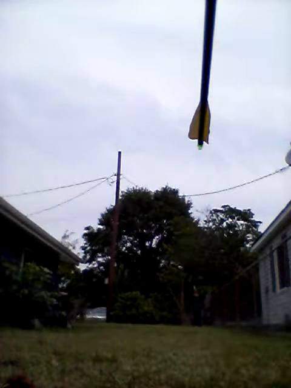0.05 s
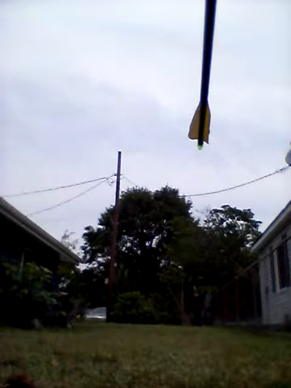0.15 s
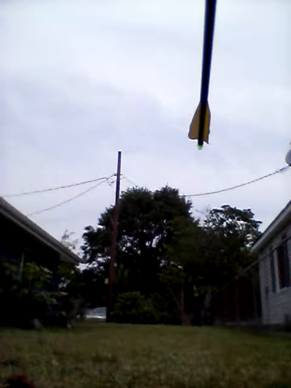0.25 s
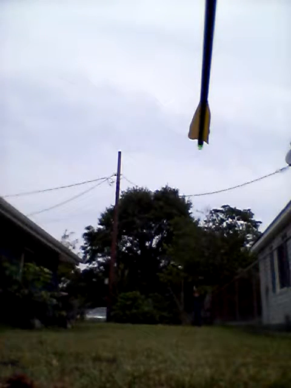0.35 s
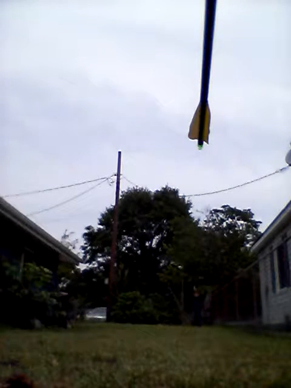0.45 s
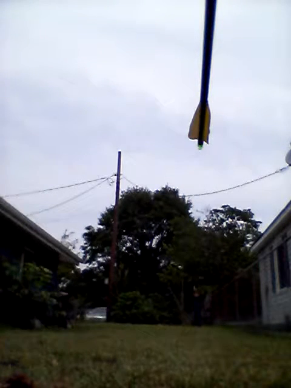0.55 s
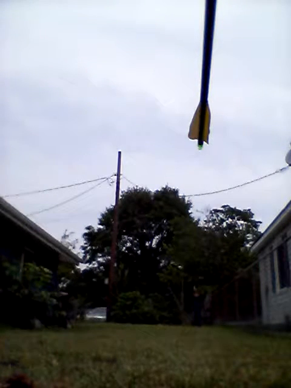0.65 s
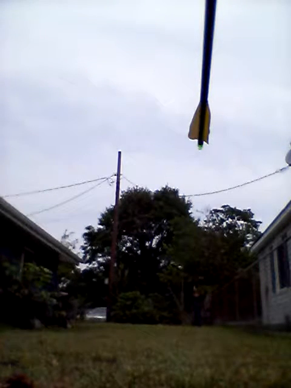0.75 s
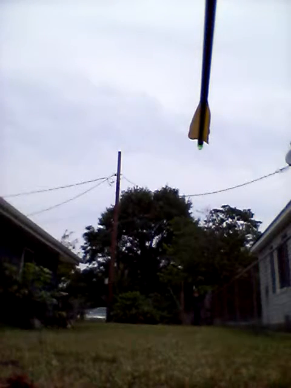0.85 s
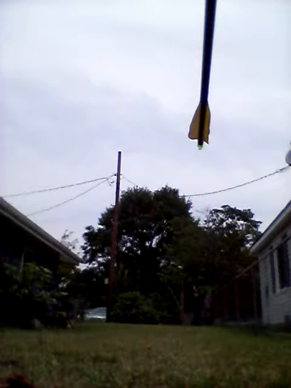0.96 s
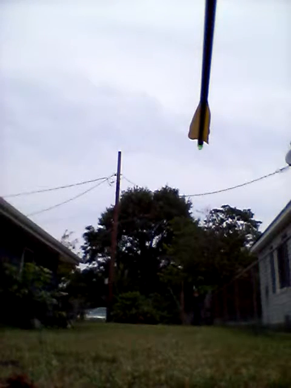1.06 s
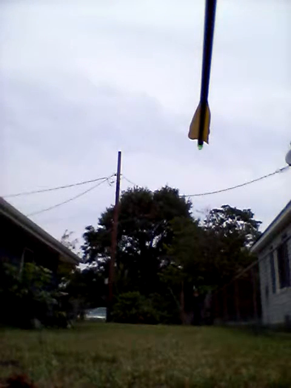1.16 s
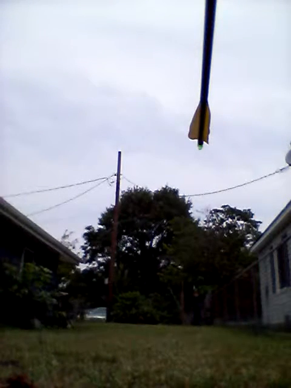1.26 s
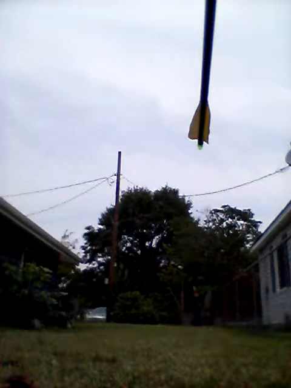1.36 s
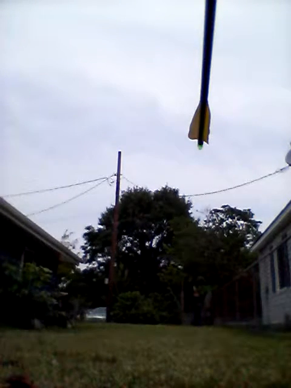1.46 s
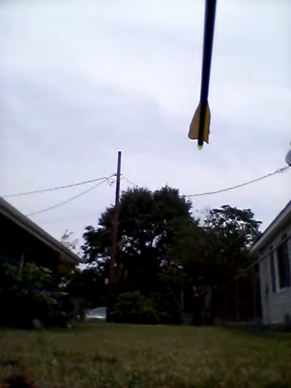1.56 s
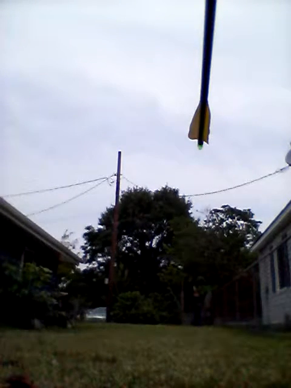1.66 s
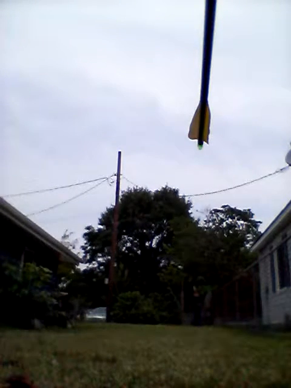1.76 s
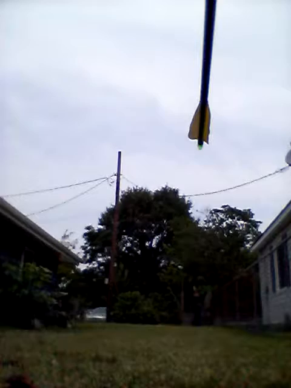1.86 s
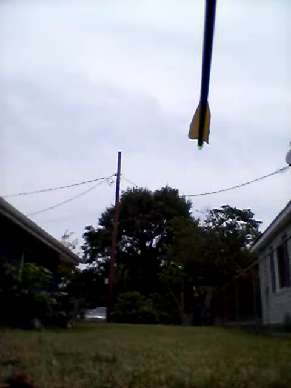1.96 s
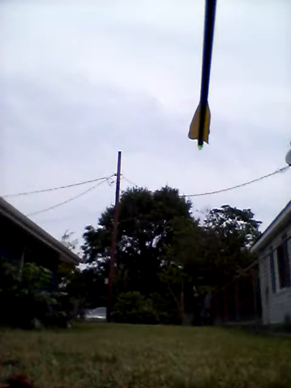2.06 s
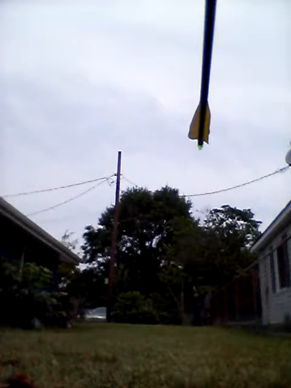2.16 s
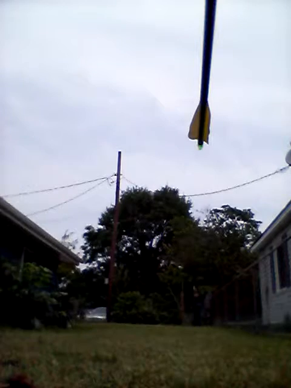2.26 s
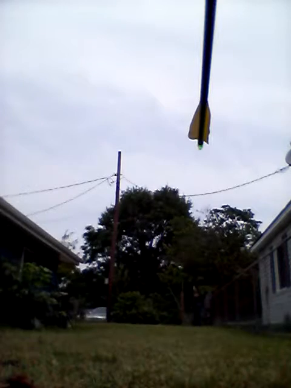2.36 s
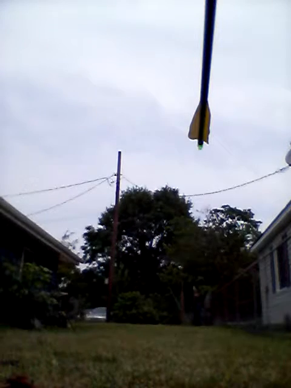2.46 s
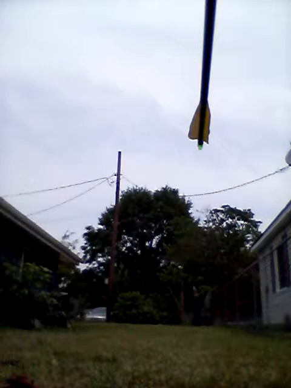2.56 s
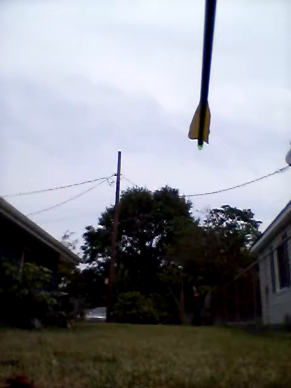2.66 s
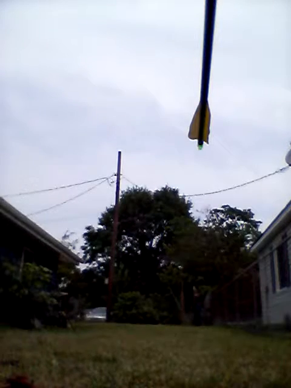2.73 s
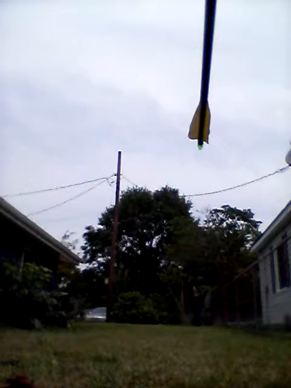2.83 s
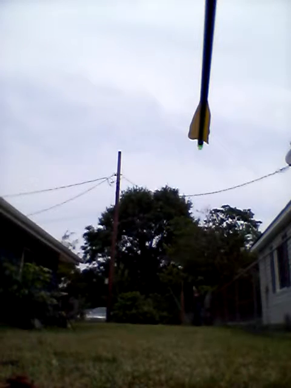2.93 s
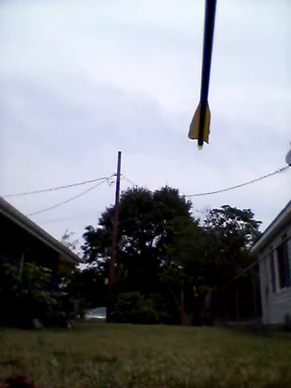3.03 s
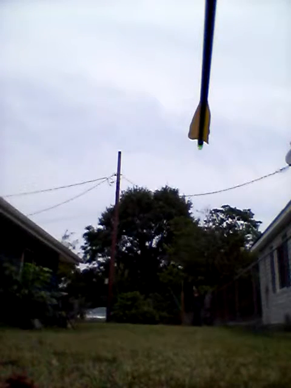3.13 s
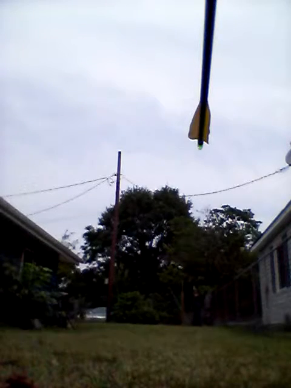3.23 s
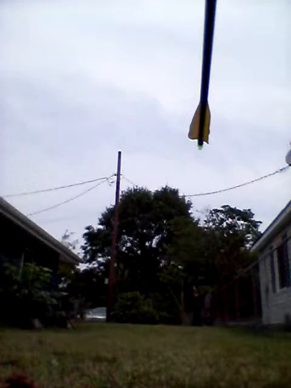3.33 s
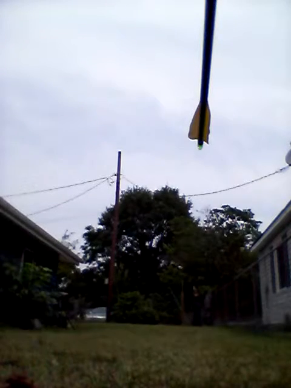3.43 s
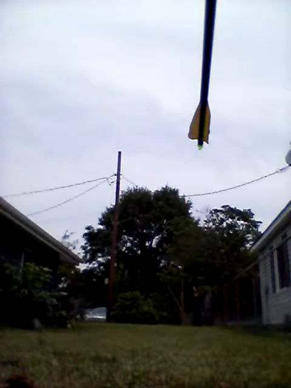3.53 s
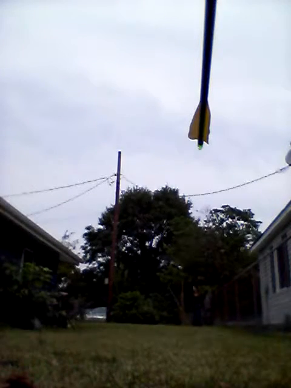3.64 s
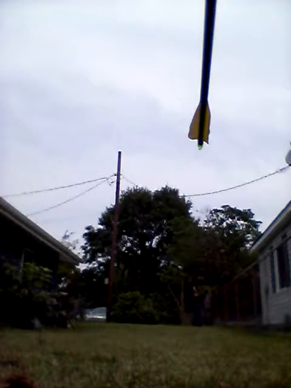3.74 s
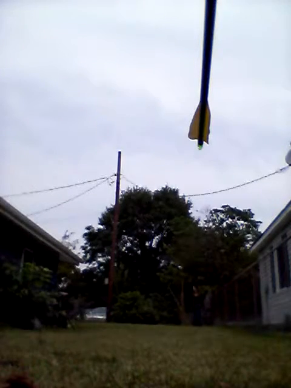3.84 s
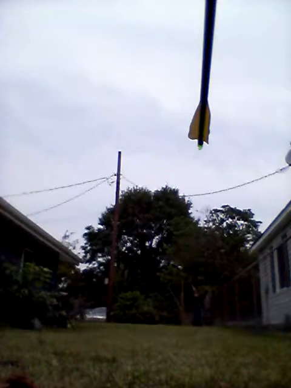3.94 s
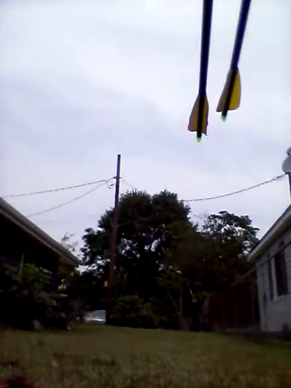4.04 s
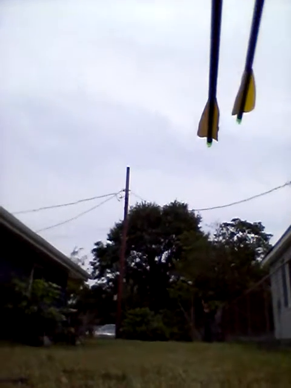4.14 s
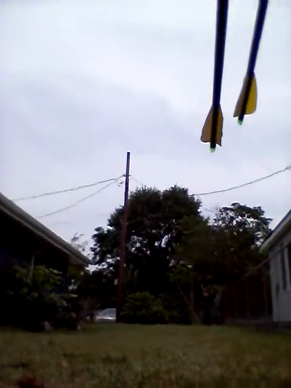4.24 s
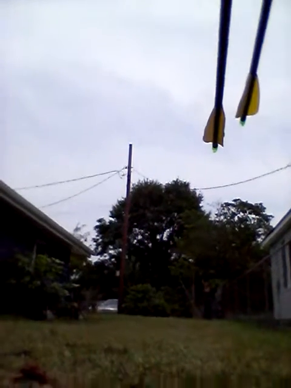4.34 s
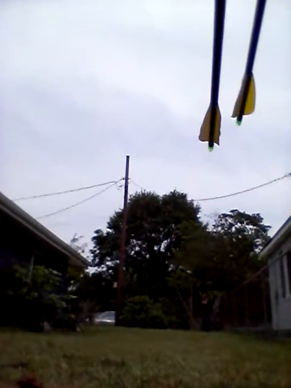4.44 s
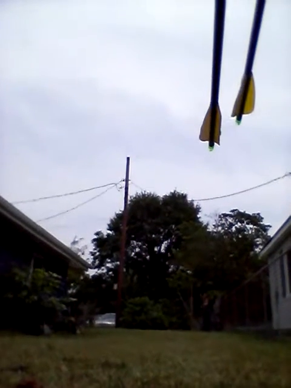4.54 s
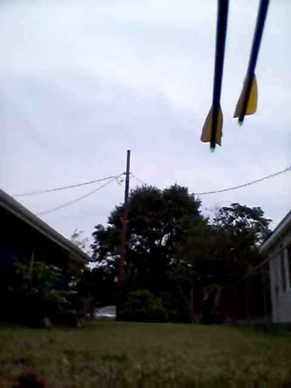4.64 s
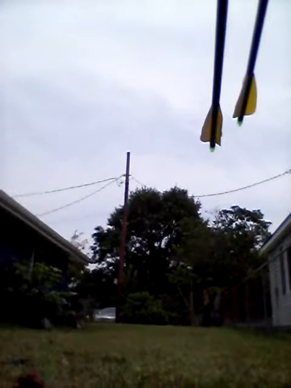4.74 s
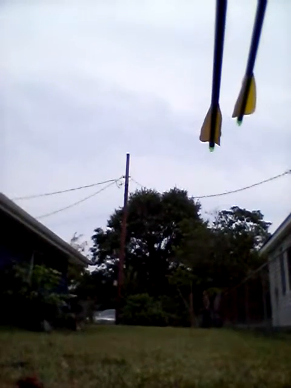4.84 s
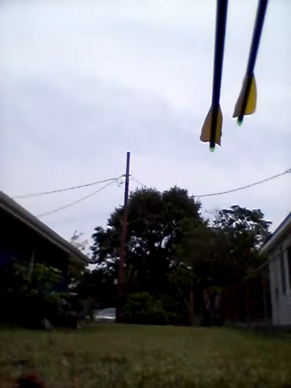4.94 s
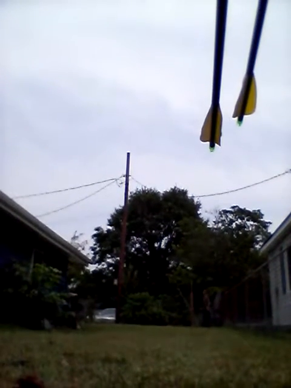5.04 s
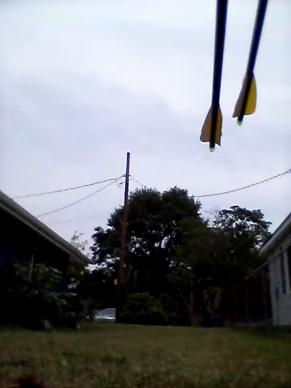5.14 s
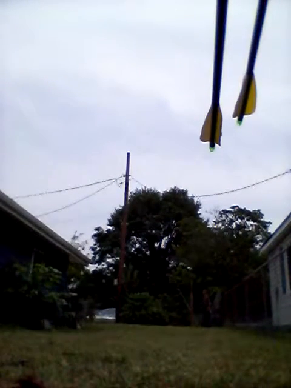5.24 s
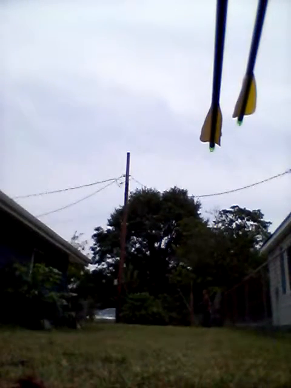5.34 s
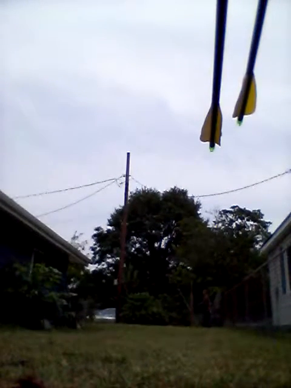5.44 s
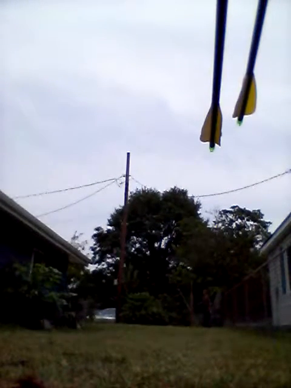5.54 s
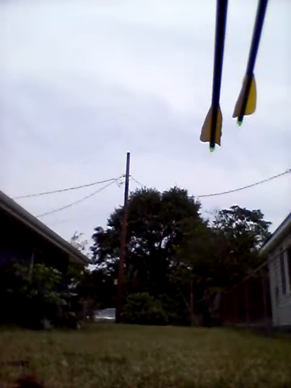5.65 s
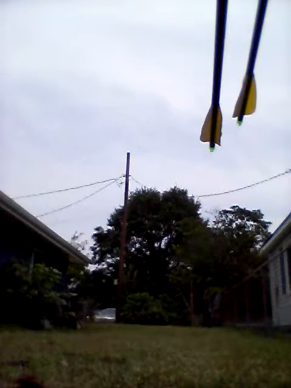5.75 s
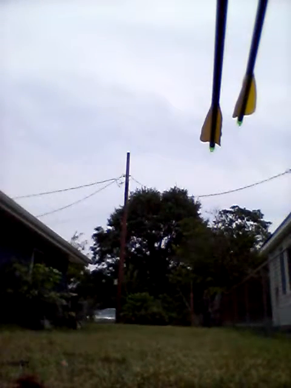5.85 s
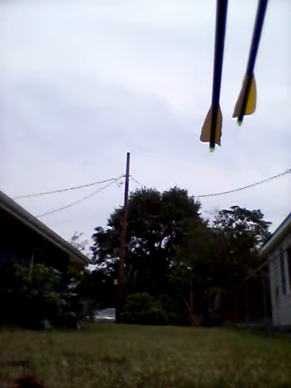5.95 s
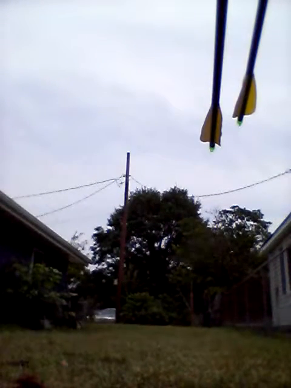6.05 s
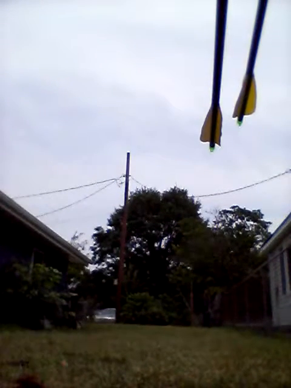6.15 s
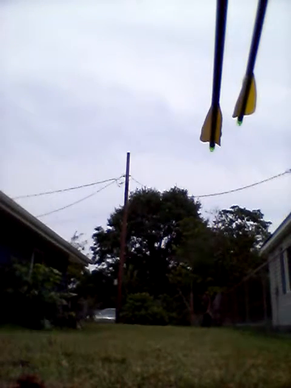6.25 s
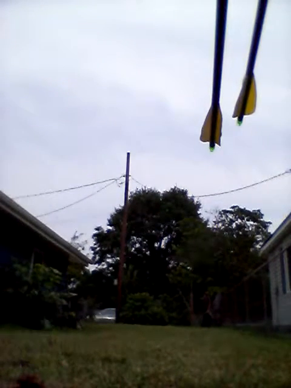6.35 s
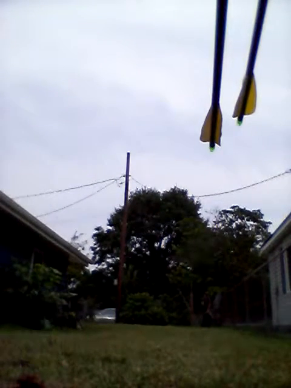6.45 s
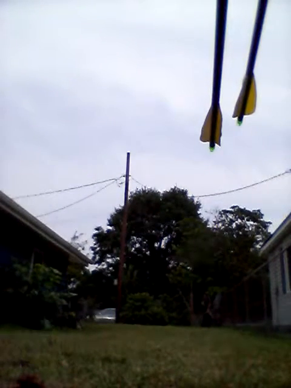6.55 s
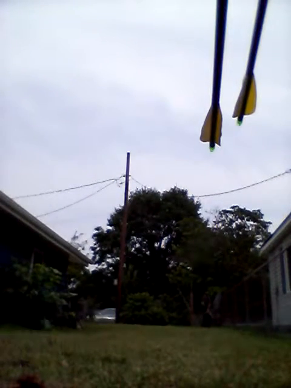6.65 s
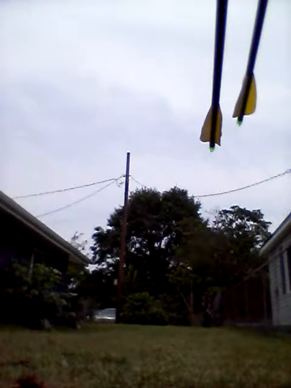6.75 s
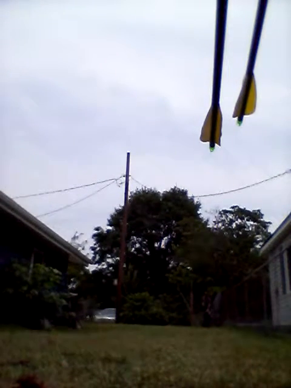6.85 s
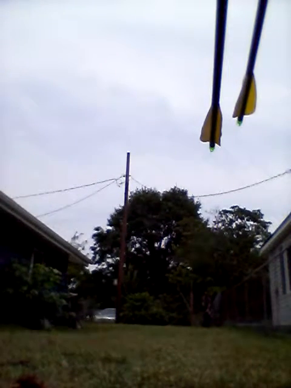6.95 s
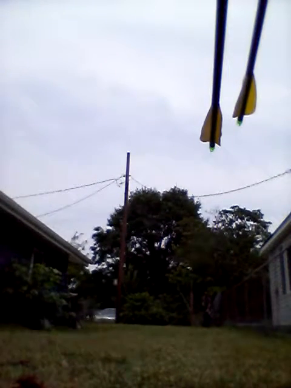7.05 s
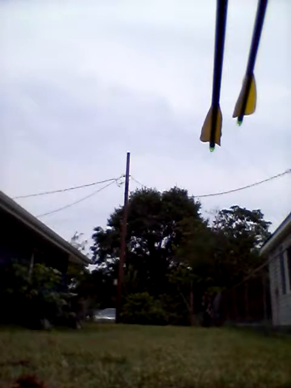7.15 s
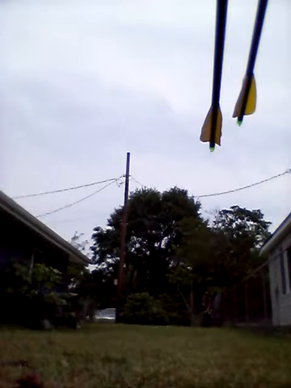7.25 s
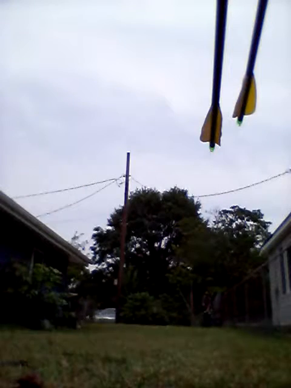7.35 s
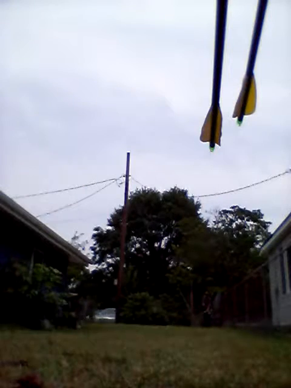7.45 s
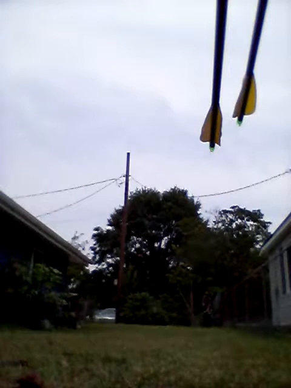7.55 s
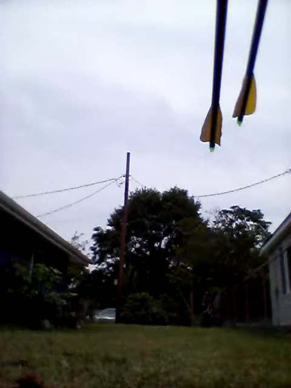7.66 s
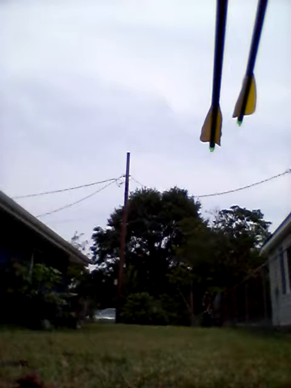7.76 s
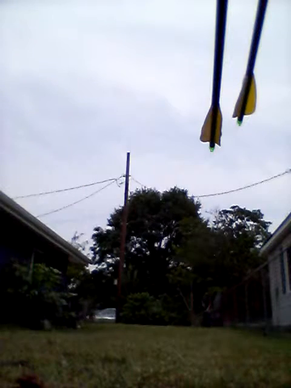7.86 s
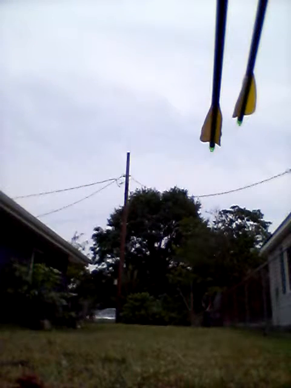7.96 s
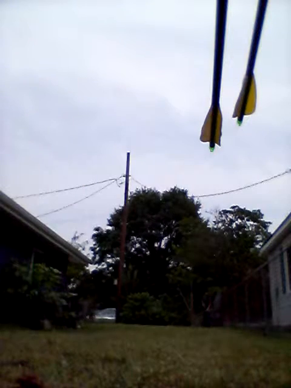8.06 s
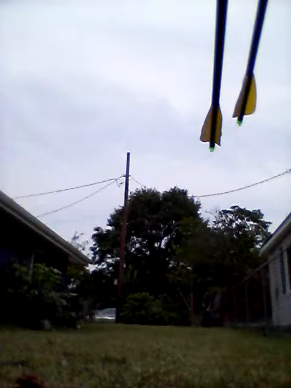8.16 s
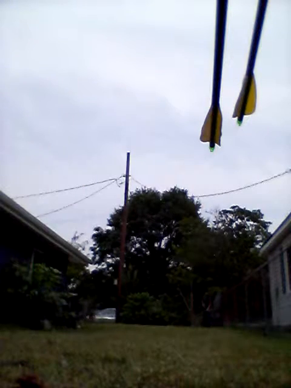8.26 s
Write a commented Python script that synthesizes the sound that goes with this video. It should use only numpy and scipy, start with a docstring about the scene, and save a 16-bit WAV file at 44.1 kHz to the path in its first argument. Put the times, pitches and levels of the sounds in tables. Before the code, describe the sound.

Faint repeated bird chirps and distant traffic, broken by a soft bow snap and the loud, close smack of an arrow striking a target.

```python
"""A backyard, heard from just under an archery target. Distant traffic and an air conditioner's hum
run throughout; thin whistles sound far off, and from 1 s a songbird repeats a falling chirp.
Near 3.9 s a distant bow snaps and the arrow hisses in. It strikes 0.2 s later with a sharp thwack,
exciting the modes of target and shaft. The shaft rattles on while walls, fences and trees scatter
the sound back. The traffic then eases a little and the bird sings on."""
import sys
import numpy as np
from scipy import signal
from scipy.fft import rfft, irfft, next_fast_len
from scipy.io import wavfile
from scipy.ndimage import uniform_filter1d, map_coordinates

SR = 44100
rng = np.random.default_rng(int(sys.argv[2]) if len(sys.argv) > 2 else 0)


def output_pcm(signal):
    """Save a mono or channel-first signal as 16-bit PCM at the path in sys.argv[1].

    Samples are clipped to [-1, 1] before scaling.
    """
    pcm = np.clip(np.atleast_2d(signal).T, -1, 1) * 32767
    wavfile.write(sys.argv[1], SR, np.round(pcm).astype(np.int16))


N = 365677

# the point slaps the face, then the shaft jams in the block and slips to rest (time [s], level [dB])
BLOWS = [(4.0835, -11), (4.0879, -13), (4.0937, -27.5), (4.0965, -22.5), (4.103, -27.5), (4.105, -27)]
# spectrum of each blow's crack (frequency [Hz], relative level [dB])
CRACK_SPECTRUM = [(300, -20.5), (1000, -7), (1800, 1), (2700, 2), (3400, -0.5), (4200, -4), (6500, 1),
                  (9000, -10.5), (13000, -11), (16500, -20.5)]
# modes of the taut face, the block it covers, the whole target on its stand and the arrow shaft
# (frequency [Hz], relative level [dB], T60 [s])
FACE_MODES = [(720.6, -18.5, .065), (946, -9, .039), (968, 0, .019), (1403, -5, 0.021)]
BLOCK_MODES = [(115, -12, 0.04), (368, 0.5, .017), (526, -14.5, 0.045), (700, -29, .03),
               (866.6, -7.5, 0.03), (1159.5, -20, .046)]
STAND_MODES = [(77, -22.5, 0.06), (201, -3, .06), (397, -5, 0.058), (604.2, -26, .04), (743, -18.5, .075)]
SHAFT_MODES = [(1920, -28, 0.05), (2700, -19, .035), (3020, -27, 0.062), (3234, -18, .05),
               (3640, -16.5, .06), (3932, -23, .055), (4680, -21.5, .055), (5180, -23, .05),
               (5750, -23.5, 0.055), (5800, -25.5, .055), (6340, -23.5, .06), (7200, -27.5, .06),
               (8570, -25.5, .055)]
HIT_S, JAM_S = BLOWS[0][0], BLOWS[1][0]


def strike():
    """Impact excitation: face, block, stand and shaft ring in their modes, and each blow cracks."""
    out, t = np.zeros(N), clock(.4)
    add(out, HIT_S, ring(FACE_MODES, t, attack=.0001))
    add(out, HIT_S, ring(STAND_MODES, t, attack=.0044))  # the stand takes the push slowly
    add(out, JAM_S + .0004, ring(BLOCK_MODES, t, attack=.0001))
    add(out, HIT_S, amp(1.5) * ring(SHAFT_MODES, t, attack=.003))
    tear = np.exp(-((t - .001) / .000696) ** 2)
    scrape = amp(-6) * decay(t, t60=.033, attack=.0006)  # the shaft slides through the filling
    for s, db in BLOWS:
        add(out, s, amp(db) * (tear + scrape) * noise(CRACK_SPECTRUM, len(t)))
    return out


def shaft_rattle(contacts_per_s=130):
    """Impulse response: as the stuck arrow shakes, each tiny contact rings the shaft again."""
    out, t = np.zeros(N), clock(.6)
    contacts = (rng.random(len(t)) < contacts_per_s / SR) * rng.choice([-1, 1], len(t))
    force = contacts * decay(t, t60=.55, attack=.05)
    rattle = signal.fftconvolve(force, ring(SHAFT_MODES, t, attack=.0003))
    add(out, HIT_S, amp(-20.5) * rattle)
    return out


def scatter_gain(t, corner_s=.083, growth_db_per_s=130, build_s=.075, loss_db_per_s=22):
    """Incoherent scattering: the returns from walls and trees add in power, t seconds after the hit."""
    # the houses on both sides return a swell that grows until their far corners are reached
    swell = amp(-33 + growth_db_per_s * np.minimum(t - corner_s, 0))
    walls = swell * (1 - np.tanh((t - corner_s) / .003)) / 2
    # fences and trees return a wash that builds up, then thins with distance and is absorbed
    reach = t / build_s
    trees = amp(-36.5 - loss_db_per_s * t) * reach / np.hypot(1, reach ** 2)
    return np.hypot(walls, trees)


# echoes of the target's low thump off the near walls (time [s], level [dB])
NEAR_ECHOES = [(4.133, -22.5), (4.153, -23.5), (4.297, -38.5), (4.518, -36)]
# modes of that thump (frequency [Hz], relative level [dB], T60 [s])
THUMP_MODES = [(108.9, -7.5, .05), (180, -3, 0.073), (242, -2, .05), (380, -10.5, .05)]
# slaps off far buildings (time [s], level before the low-pass [dB], T60 [s], cutoff [Hz])
FAR_ECHOES = [(4.292, -42, .03, 12000), (4.3123, -30, 0.027, 12000), (4.325, -39.5, 0.11, 2300),
              (4.357, -45, 0.03, 9000), (4.456, -46, 0.13, 1200), (4.488, -43, 0.14, 900),
              (4.683, -45.5, 0.066, 2310)]
# spectra of the scattered wash and of a slap (frequency [Hz], relative level [dB])
WASH_SPECTRUM = [(40, -1.5), (110, 9), (200, 7.5), (330, 4.5), (700, 1.5), (1400, -6.5), (2550, -7.5),
                 (3050, 1), (3600, -1), (5500, 1), (7000, -3), (8650, -7), (9700, -15), (16000, -19)]
SLAP_SPECTRUM = [(100, -9), (500, -7), (1000, 5), (1300, -16), (1800, 3.5), (2700, -11), (3700, -5),
                 (5000, 2), (5900, -10), (7000, -5), (9000, -23), (16000, -36)]


def echoes():
    """Reflection: the strike returns as a diffuse wash, thumps from near walls and slaps from far ones."""
    out, t = np.zeros(N), clock(.98)
    grainy_envelope = scatter_gain(t) * amp(2.4 * wobble(260, len(t)))
    add(out, HIT_S, grainy_envelope * noise(WASH_SPECTRUM, len(t)))
    for s, db in NEAR_ECHOES:
        add(out, s, amp(db) * ring(THUMP_MODES, t, attack=.0057))
    for s, db, t60, cutoff_hz in FAR_ECHOES:
        slap = decay(t, t60, attack=.000404) * noise(SLAP_SPECTRUM, len(t))
        lowpass = signal.butter(2, cutoff_hz, fs=SR)
        add(out, s, amp(db) * signal.lfilter(*lowpass, slap))
    return out


# the bow's release and its echo (time [s], thump level [dB], slap level [dB], slap T60 [s])
RELEASES = [(3.870, -31.5, -35, .15), (3.908, -42.5, -49.5, .3)]
# modes of the bow's limbs (frequency [Hz], relative level [dB], T60 [s])
LIMB_MODES = [(225, -3, 0.17), (267.5, 1.5, 0.096), (325.7, -6.5, 0.13), (467.2, -2, .07), (591, -2.5, .08),
              (798, -8, 0.076)]
# spectrum of the string's slap (frequency [Hz], relative level [dB])
STRING_SPECTRUM = [(200, -3), (800, -1), (1600, -19.5), (2300, -5), (3700, -0.5), (4700, -7), (6400, 1),
                   (7700, -8), (9500, -17), (16000, -24)]


def bow():
    """Free vibration: the released limbs thump in damped modes while the string slaps."""
    out, t = np.zeros(N), clock(.6)
    for s, thump_db, slap_db, t60 in RELEASES:
        add(out, s, amp(thump_db) * ring(LIMB_MODES, t, attack=.0067))
        add(out, s, amp(slap_db) * decay(t, t60, attack=.0062) * noise(STRING_SPECTRUM, len(t)))
    return out


# spectrum of air rushing over the vanes (frequency [Hz], relative level [dB])
VANE_SPECTRUM = [(300, -6), (1500, -8), (3000, -2.5), (6500, 0.5), (9000, -4.5), (16000, -6.5)]


def flight(speed_m_per_s=60, closest_m=.7):
    """Spherical spreading: the vanes' hiss grows as one over the arrow's distance."""
    release_s = RELEASES[0][0]
    out, t = np.zeros(N), clock(HIT_S - release_s)
    distance_m = np.hypot(speed_m_per_s * (t[-1] - t), closest_m)
    add(out, release_s, amp(-52.5) / distance_m * noise(VANE_SPECTRUM, len(t)))
    return out


def chirp(top_hz, rise_db, length_s=.093, hook_s=.012, end_share=.595, warble_rate_hz=43):
    """Frequency modulation: a raspy tone hooks up to its top pitch, then falls in warbling steps."""
    t = clock(length_s)
    hook_hz = 250 * np.maximum(1 - t / hook_s, 0)
    fallen = np.clip((t - hook_s) / (length_s - hook_s), 0, 1)
    glide_hz = top_hz * (end_share + (1 - end_share) * (1 - fallen) ** 1.45) - hook_hz
    warble = np.cos(2 * np.pi * warble_rate_hz * (t - .048))
    rasp_hz = 170 * wobble(450, len(t))
    hz = glide_hz + 150 * warble * np.sqrt(fallen) + rasp_hz
    phase = 2 * np.pi * np.cumsum(hz) / SR
    envelope = np.minimum(t / .0122, 1) * np.minimum((length_s - t) / .016, 1)
    octave = amp(-13.5) * np.exp(-((hz - 3580) / 150) ** 2)  # sounds only partway down the fall
    # the voice is loudest on each crest of the warble and weakens halfway through the call
    dip_db = 3.5 * np.exp(-((t - .05) / .014) ** 2)
    level_db = 4.5 * (warble - .8) - dip_db + rise_db * t / length_s
    return envelope * amp(level_db) * (np.sin(phase) + octave * np.sin(2 * phase))


def among_trees(song, far_db, t60):
    """Multipath propagation: song arrives directly, off a house wall and scattered by foliage."""
    t = clock(.6)
    far = unit(rng.standard_normal(len(t)) * decay(t, t60, attack=.011))
    near = unit(rng.standard_normal(len(t)) * decay(t, t60=.029, attack=.0013))
    response = (amp(far_db) * far + near) / np.sqrt(len(t))
    response[0] += .6  # direct path
    wall_delay_s = abs(.017 + .001 * rng.standard_normal())
    response[int(wall_delay_s * SR)] += .75
    return signal.fftconvolve(song, response / np.linalg.norm(response))


# the near bird's calls (time [s], top pitch [Hz], level [dB], level rise over the call [dB])
CHIRPS = [(0.964, 4370, -53.5, 5), (1.267, 4230, -57.5, 12), (1.619, 4450, -55.5, 6),
          (2.135, 4450, -56.5, 10), (3.048, 4645, -49.5, 0), (3.679, 4580, -46.5, -0.5),
          (4.374, 4620, -43.5, -10), (4.831, 4574, -48, -0.5), (5.269, 4526, -45.5, -4.5),
          (5.834, 4820, -46, -14.5), (6.306, 4744, -43, -20.5), (6.878, 4590, -47.5, -13.5),
          (7.453, 4700, -42.5, -13.5), (7.889, 4576, -50, -3.5)]
# birds farther off (time [s], length [s], start pitch [Hz], end pitch [Hz], level [dB], waver [Hz])
WHISTLES = [(0, 0.16, 5580, 5560, -53.5, 193), (0.511, 0.056, 2860, 2590, -58, 50),
            (.6, 0.051, 2360, 2156, -64, 50), (1.207, 0.028, 5700, 5020, -65, 200)]


def birds():
    """Gliding tones in reverberation: one bird chirps nearby, and thin buzzy whistles sound far off."""
    out = np.zeros(N)
    for s, top_hz, db, rise_db in CHIRPS:
        add(out, s, amp(db) * among_trees(chirp(top_hz, rise_db), far_db=-1.5, t60=.39))
    for s, length_s, start_hz, end_hz, db, waver_hz in WHISTLES:
        size = int(length_s * SR)
        hz = np.linspace(start_hz, end_hz, size) + waver_hz * wobble(900, size)
        whistle = signal.windows.tukey(size, .15) * np.sin(2 * np.pi * np.cumsum(hz) / SR)
        add(out, s, amp(db) * among_trees(whistle, far_db=-3.5, t60=.62))
    return out


# spectrum of distant traffic (frequency [Hz], relative level [dB])
TRAFFIC_SPECTRUM = [(25, -7), (38, -9), (55, 4.5), (75, -6), (150, -3.5), (240, 2.5), (310, 1), (420, -5.5),
                    (700, -8), (950, -12.5), (1300, -22.5), (2200, -22), (4000, -32), (6500, -29.5),
                    (9500, -44.5)]


def traffic(level_db):
    """Amplitude-modulated noise: the distant roar swells in uneven patches, deepest in the bass."""
    spectrogram = signal.stft(noise(TRAFFIC_SPECTRUM, N), nperseg=1024)[2]
    patches = uniform_filter1d(rng.standard_normal(spectrogram.shape), size=5, axis=0)
    patches = uniform_filter1d(patches, size=9, axis=1)
    depth_db = 2.2 / (1 + np.arange(len(spectrogram))[:, None] / 40)
    roar = signal.istft(spectrogram * amp(depth_db * unit(patches)), nperseg=1024)[1][:N]
    return amp(level_db + .6 * wobble(5.9, N)) * unit(roar)


# the air conditioner's tones (frequency [Hz], relative level [dB])
HUM_LINES = [(118.4, -64), (188.4, -59.5), (355.3, -67.5), (527.6, -65.5), (1061, -87), (1120, -86),
             (1179, -76.5), (1297, -80)]


def air_conditioner(t, gain_db):
    """Line spectrum: the hum is a sum of tones, each wandering in level and phase."""
    hum = np.zeros(N)
    for hz, db in HUM_LINES:
        peak = np.sqrt(2) * amp(db + 2.5 * wobble(3, N))
        hum += peak * np.sin(2 * np.pi * hz * t + .79 * wobble(6, N))
    return amp(gain_db) * hum


# spectrum of the microphone's hiss (frequency [Hz], relative level [dB])
HISS_SPECTRUM = [(1000, 2.5), (9000, -4), (12500, -1), (15500, -1), (15900, -39.5)]


def background(ease_db=3, ease_at_s=4.45):
    """Noise floor: traffic and hum ease off once, together, over the microphone's steady hiss."""
    t = np.arange(N) / SR
    traffic_db = -53 - ease_db * (1 + np.tanh((t - ease_at_s) / .4)) / 2
    hum_gain_db = traffic_db - traffic_db.mean() - 3.5  # the hum carries better when the traffic does
    return traffic(traffic_db) + air_conditioner(t, hum_gain_db) + amp(-72) * noise(HISS_SPECTRUM, N)


def ring(modes, t, attack):
    """Modal superposition: damped sinusoids, with neighbours swinging in opposite directions."""
    out = np.zeros(len(t))
    for k, (hz, db, t60) in enumerate(modes):
        gain = (-1) ** k * amp(db + .3 * rng.standard_normal())
        out += gain * np.sin(2 * np.pi * hz * t) * decay(t, t60, attack)
    return out


def decay(t, t60, attack):
    """Exponential damping: a quick rise, then a fall of 60 dB every t60 seconds."""
    return amp(-60 * t / t60) * (1 - np.exp(-t / attack))


def noise(spectrum, size):
    """Spectral shaping: white noise filtered to the given spectrum, with rms near 1."""
    m = next_fast_len(size + 8192)
    hz, db = np.transpose(spectrum)
    gain = amp(np.interp(np.log(np.fft.rfftfreq(m, 1 / SR) + 1), np.log(hz), db))
    return unit(irfft(rfft(rng.standard_normal(m)) * gain, m))[:size]


def wobble(rate, size):
    """Spline interpolation: a smooth curve through `rate` random knots a second."""
    knots = rng.standard_normal(int(size * rate / SR) + 4)
    fine = np.arange(0, len(knots) - 1, 1 / 8)
    return np.interp(np.arange(size) * rate / SR, fine, map_coordinates(knots, [fine]))


def amp(db):
    """Decibels to amplitude ratio."""
    return 10 ** (np.asarray(db) / 20)


def unit(x):
    """Normalisation to rms 1."""
    return x / np.sqrt(np.mean(x ** 2) + 1e-20)


def clock(seconds):
    """Uniform sampling: times from zero."""
    return np.arange(int(seconds * SR)) / SR


def add(track, s, sound):
    """Superposition: mix a sound into the track at s seconds."""
    start = max(round(s * SR), 0)
    track[start:start + len(sound)] += sound[:N - start]


def scene():
    """Linear superposition: all sources sum at one microphone."""
    return (strike() + shaft_rattle() + echoes() + bow() + flight() + birds() + background())[None]


def record(dry, ceiling=.98, low_hz=44.1, top_hz=16000):
    """Saturation and band limiting: the microphone rounds off peaks and drops deep bass and top treble."""
    saturated = dry / (1 + np.abs(dry / ceiling) ** 6) ** (1 / 6)
    m = next_fast_len(N + 8192)
    hz = np.fft.rfftfreq(m, 1 / SR)
    highpass = 1 - 1 / (1 + (hz / low_hz) ** 6)
    lowpass = 1 / (1 + (hz / top_hz) ** 120)
    return irfft(rfft(saturated, m) * highpass * lowpass, m)[..., :N]


dry = scene()
out = record(dry)
output_pcm(out)
```